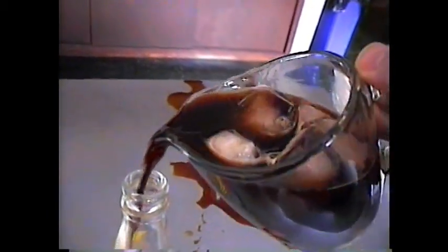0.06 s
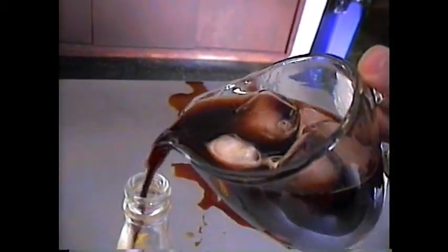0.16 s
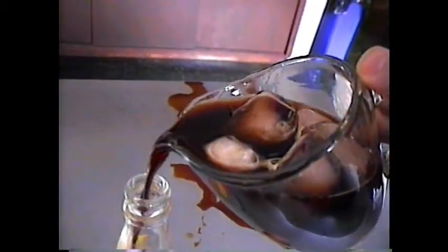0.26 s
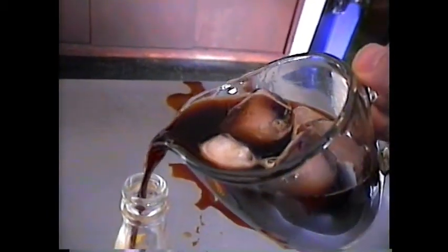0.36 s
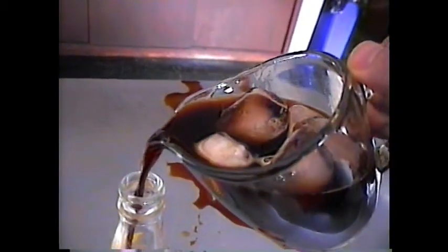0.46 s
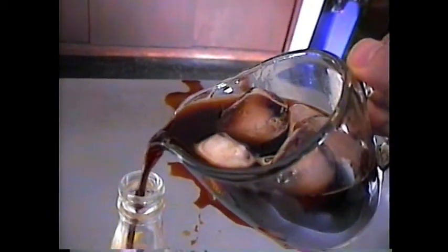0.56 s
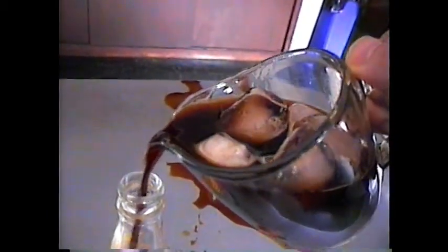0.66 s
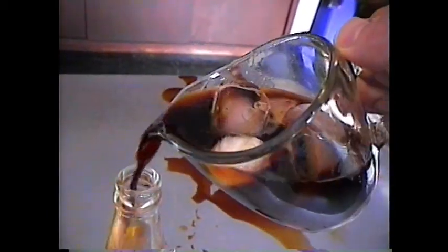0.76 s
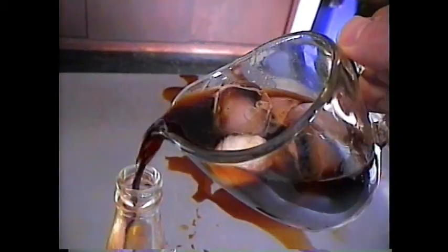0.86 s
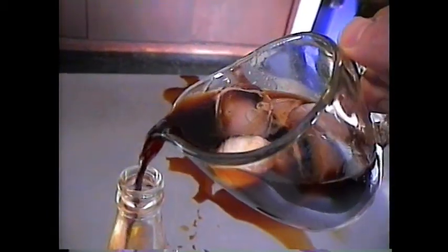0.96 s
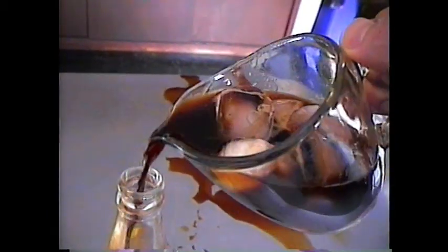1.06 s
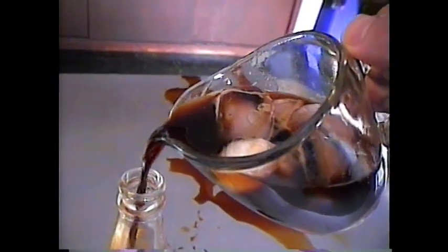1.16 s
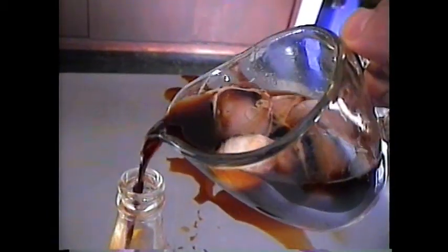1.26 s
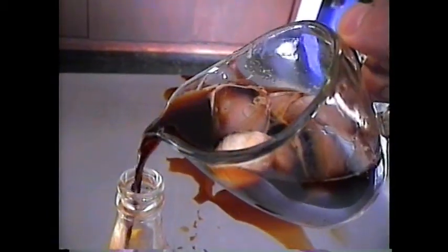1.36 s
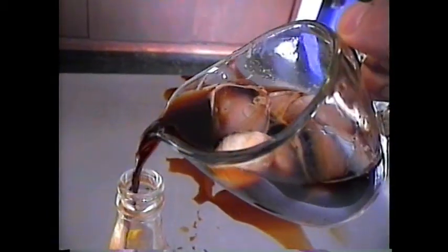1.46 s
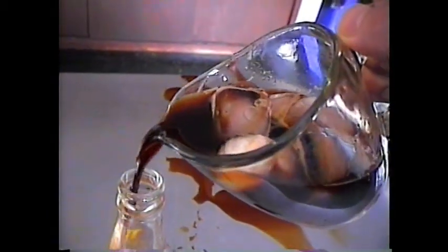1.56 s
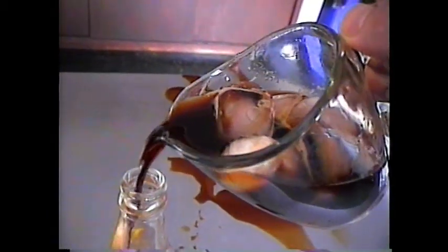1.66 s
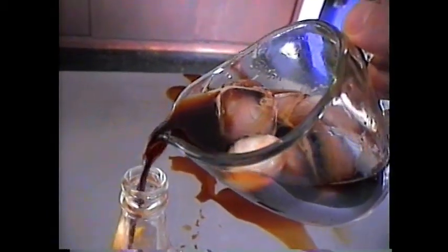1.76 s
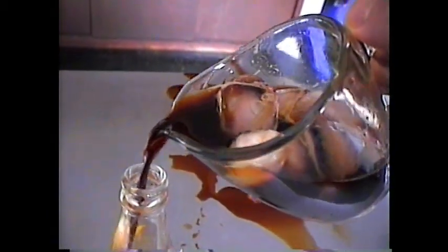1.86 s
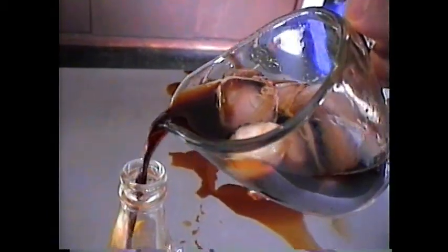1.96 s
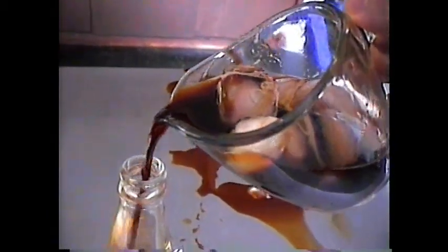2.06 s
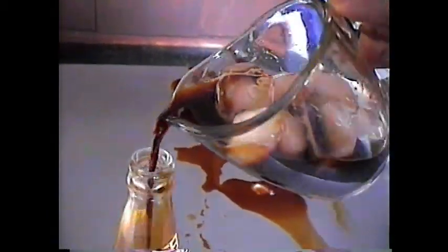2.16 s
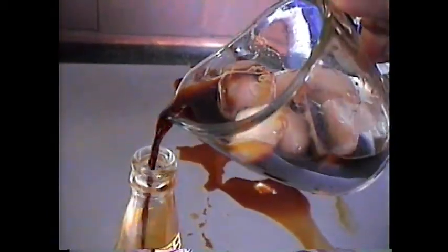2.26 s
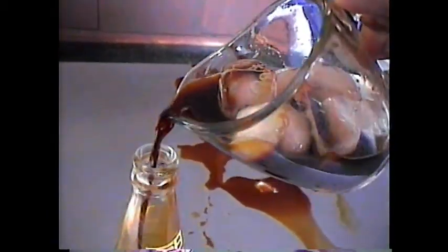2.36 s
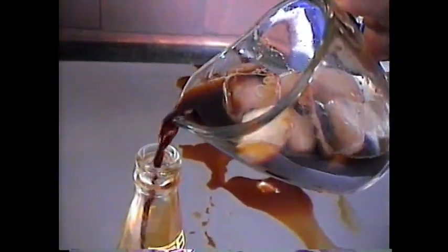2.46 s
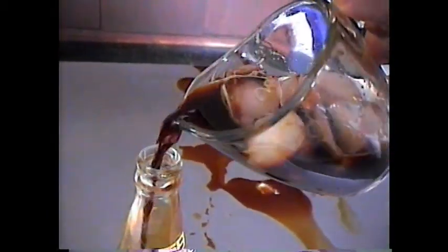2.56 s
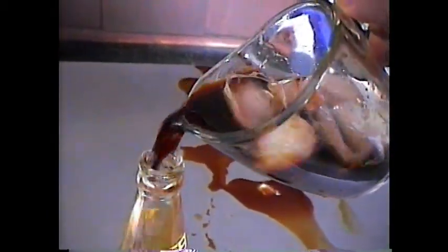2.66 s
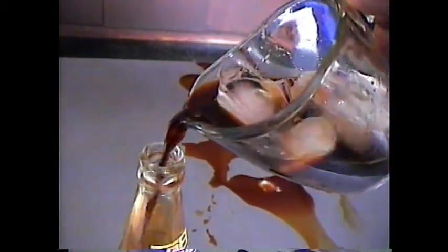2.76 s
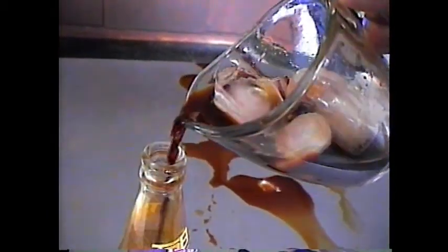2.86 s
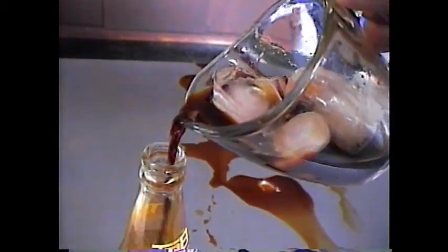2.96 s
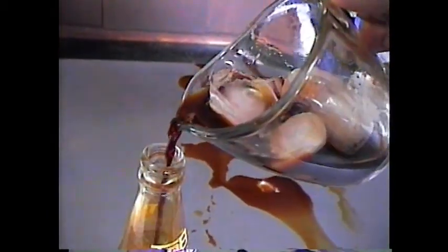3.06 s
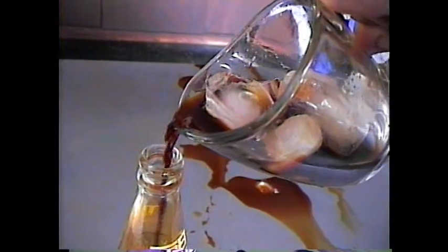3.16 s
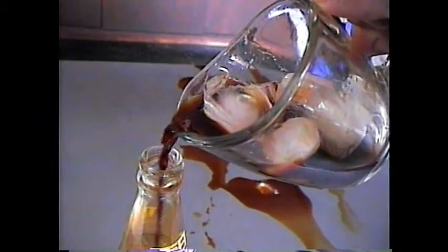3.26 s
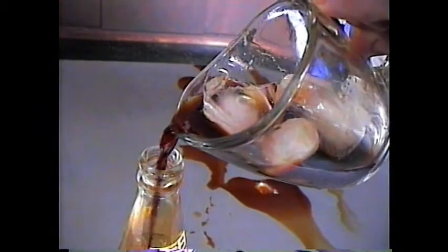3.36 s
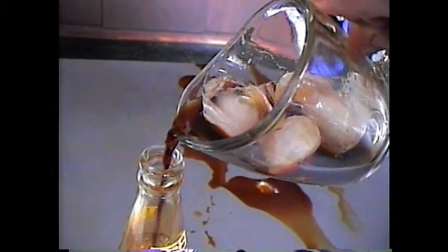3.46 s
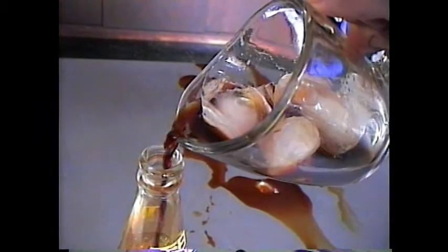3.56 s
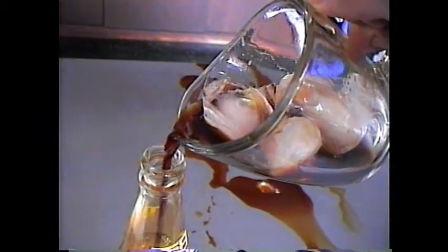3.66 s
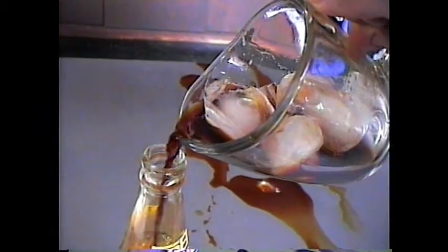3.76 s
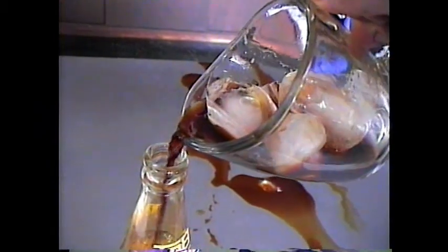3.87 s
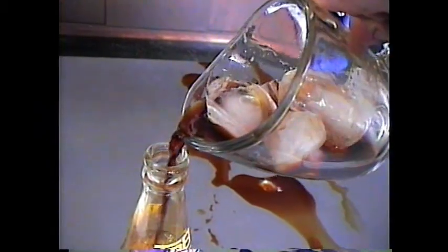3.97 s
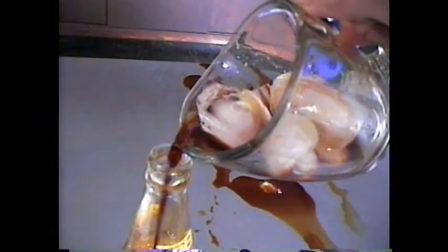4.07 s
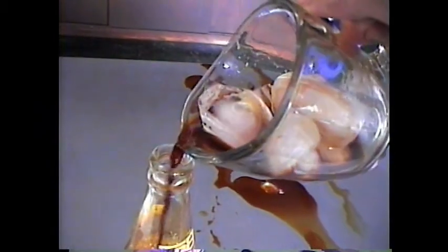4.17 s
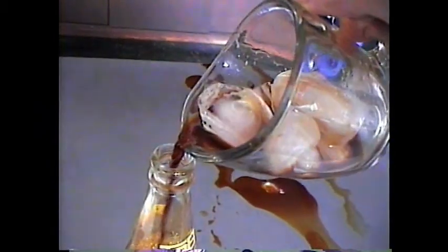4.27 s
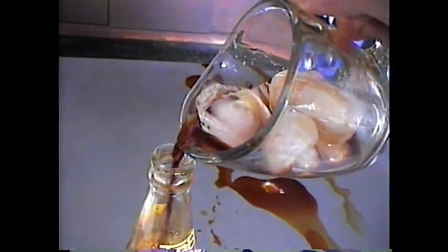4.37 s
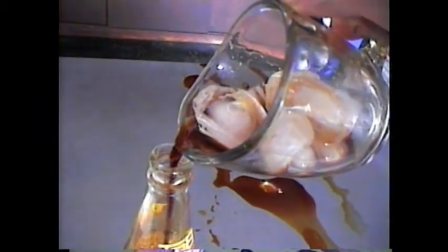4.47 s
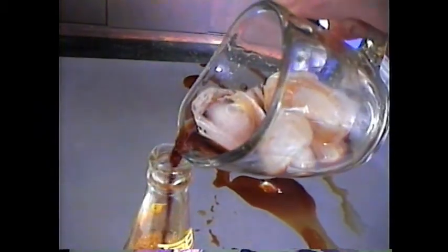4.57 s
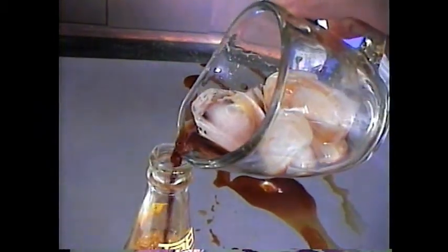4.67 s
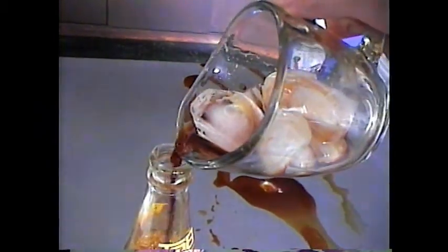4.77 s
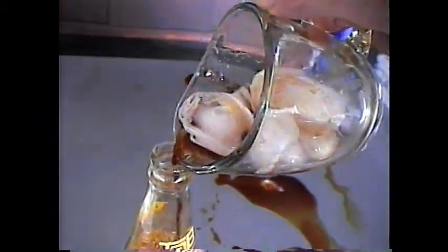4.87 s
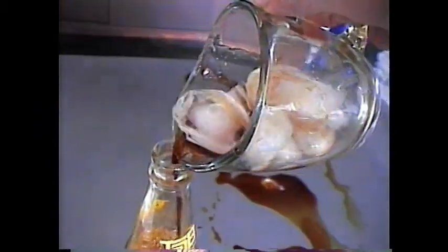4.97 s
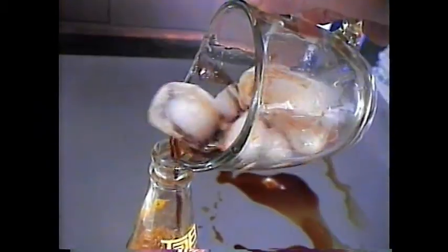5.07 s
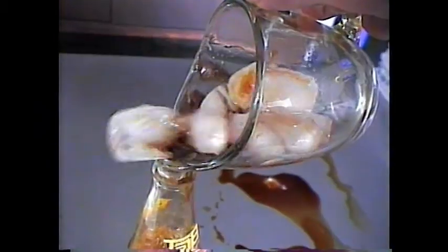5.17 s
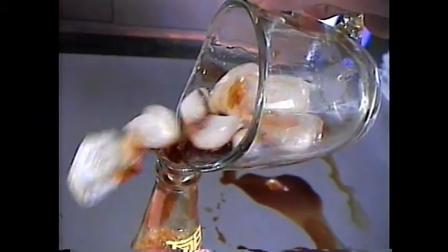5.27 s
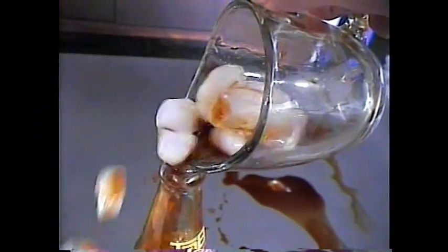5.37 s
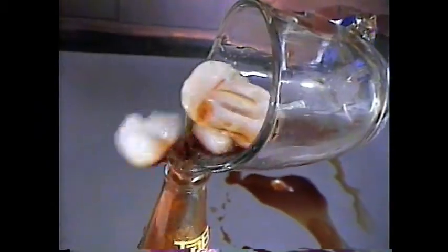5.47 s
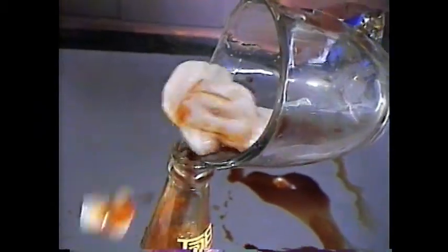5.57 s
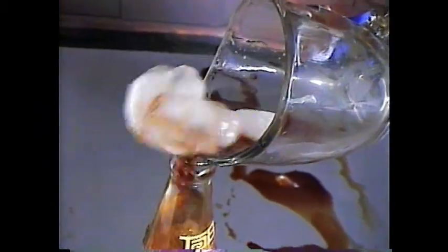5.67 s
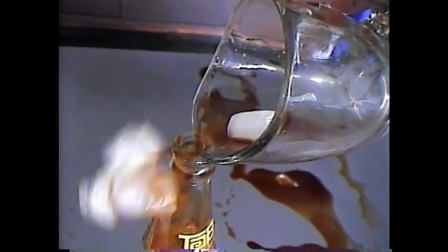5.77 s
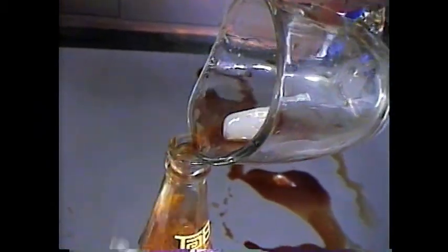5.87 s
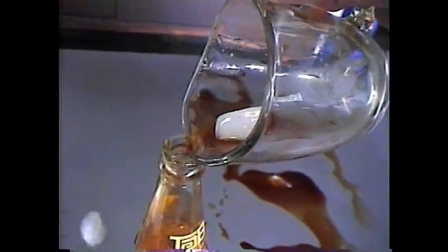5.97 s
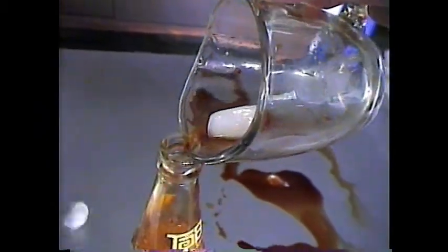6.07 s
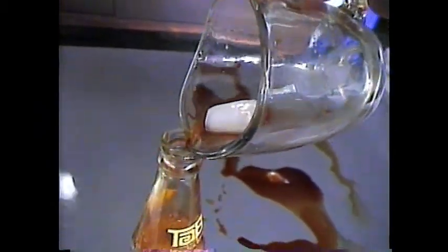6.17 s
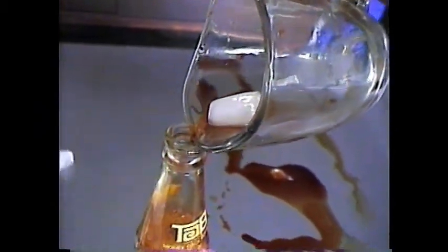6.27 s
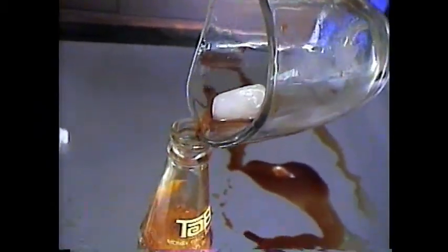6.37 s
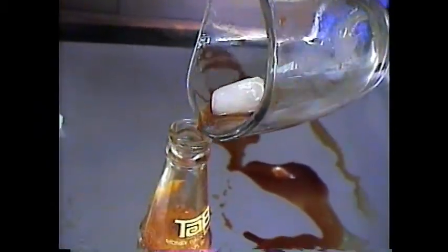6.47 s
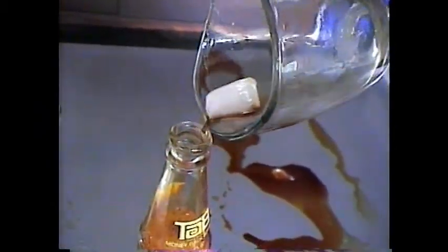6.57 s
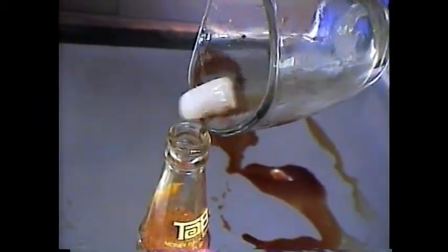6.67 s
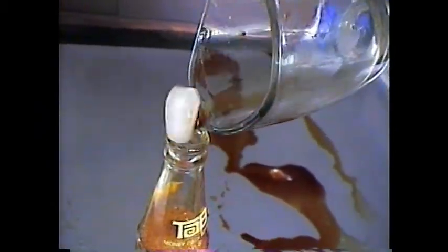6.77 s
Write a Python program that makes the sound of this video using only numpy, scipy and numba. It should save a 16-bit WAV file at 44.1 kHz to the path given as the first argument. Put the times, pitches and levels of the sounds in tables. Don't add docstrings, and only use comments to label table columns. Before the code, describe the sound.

Close in a small kitchen, cold liquid slaps and plinks into a narrow bottle, hollow notes slowly climbing. The stream thins, ice clicks wetly and sparse drips follow. Then cubes rattle against the glass pitcher, spill out and crash on a hard counter, a last one landing farther off. A lo-fi camera microphone on the left only adds hum, hiss and ticking.

```python
import sys
import numpy as np
from scipy import signal
from scipy.fft import rfft, irfft, next_fast_len
from scipy.io import wavfile
from scipy.ndimage import map_coordinates
from numba import njit

SR = 44100
rng = np.random.default_rng(int(sys.argv[2]) if len(sys.argv) > 2 else 0)


def inscribe(sig):
    pcm = np.round(np.clip(np.atleast_2d(sig).T, -1, 1) * 32767)
    wavfile.write(sys.argv[1], SR, pcm.astype(np.int16))


def ratio_of_db(decibels):
    return 10 ** (np.asarray(decibels, float) / 20)


N = 300762


def unit(x):
    return x / np.sqrt(np.mean(x ** 2) + 1e-20)


def seconds(length):
    return np.arange(length) / SR


def along(points, hz):
    f, v = np.transpose(points)
    return np.interp(np.log(hz + 1), np.log(f + 1), v)


def curves(rows):
    s, *columns = np.transpose(rows)
    return [np.interp(seconds(N), s, column) for column in columns]


def filtered(x, response):
    m = next_fast_len(len(x) + 8192)
    return irfft(rfft(x, m) * response(np.fft.rfftfreq(m, 1 / SR)), m)[:len(x)]


def peak(f, hz, width):
    return 1j * f * width / (hz * hz - f * f + 1j * f * width + 1e-9)


def add(track, s, sound):
    part = track[round(s * SR):][:len(sound)]
    part += sound[:len(part)]


def wander(points):
    return map_coordinates(rng.standard_normal(points), [np.linspace(0, points - 1, N)])


@njit
def resonate(x, turn, keep):
    y, z = np.zeros(len(x)), 0j
    for i in range(len(x)):
        z = z * keep * np.exp(1j * turn[i]) + x[i]
        y[i] = z.imag
    return y


def air(x, hz, width_hz):
    return resonate(x, 2 * np.pi * hz / SR, np.exp(-np.pi * width_hz / SR))


def snap(hz, t60, spread, body_db):
    t = seconds(900)
    front = 1 - np.exp(-t / 0.00026)
    burst = rng.standard_normal(len(t)) * ratio_of_db(-60 * t / t60) * front
    burst = filtered(burst, lambda f: 1 / (1 + 1j * f / 7000) ** 2 + ratio_of_db(body_db) * peak(f, hz, spread * hz) ** 2)
    return burst / np.abs(burst).max()


def snap_each(table, t60, spread, body_db):
    out = np.zeros(N)
    for s, db, hz in table:
        add(out, s, ratio_of_db(db - 2.5) * snap(hz, t60, spread, body_db))
    return out


def ping(table, rise, attack):
    out, t = np.zeros(N), seconds(SR // 8)
    for s, db, hz, t60 in table:
        swell = 1 - np.exp(-t / attack)
        add(out, s, ratio_of_db(db - 60 * t / t60) * swell * np.sin(2 * np.pi * hz * t * (1 + rise * t / t60)))
    return out


def droplets(count, centre_hz, cycles, scatter_db):
    draw, step = rng.random((count, 2)), np.arange(160)
    hz = np.clip(centre_hz * np.exp(0.464 * rng.standard_normal(count)), 300, 12000)[:, None]
    size = ratio_of_db(scatter_db * np.minimum(-np.log(draw[:, 1:]), 3))
    grains = size * np.exp(-step * hz / SR / cycles) * np.sin(2 * np.pi * hz * step / SR)
    at = (draw[:, :1] * N).astype(int) + step
    return unit(np.bincount(at.ravel(), grains.ravel(), minlength=N)[:N])


# (time [s], cavity note [Hz], first pipe note [Hz], second pipe note [Hz])
BOTTLE_AIR = [
    (0, 241, 1436, 2180),
    (.3, 244, 1480, 2280),
    (.75, 250, 1530, 2340),
    (1.2, 255, 1660, 2650),
    (2.2, 271, 1720, 2930),
    (3, 304, 1820, 3600),
    (5.1, 347, 2150, 3400),
]
# (time [s], fine spatter level [dB], cavity drone level [dB])
STREAM = [(0.0, -39.5, -42), (0.1, -45.5, -36), (0.5, -46, -44.5), (0.745, -46, -39.5), (0.762, -64, -82),
          (.9, -55.5, -57), (1.05, -45.5, -37), (1.4, -49.5, -48.5), (1.74, -47, -41.5), (1.77, -59, -59),
          (1.82, -51, -47.5), (2.2, -48.5, -46.5), (2.25, -56, -65), (2.6, -54.5, -48), (3, -59, -46.5),
          (4.0, -56, -53), (4.52, -60.5, -52), (5.1, -59.5, -54)]
# (time [s], slap level [dB], cavity note level [dB], pipe note level [dB])
FULL_DROPS = [(0.03, -30.5, -60, -46), (0.058, -44, -63, -53), (0.0713, -39, -68, -36),
              (0.0951, -35.5, -36, -100), (0.1355, -45, -35, -56), (0.1543, -37, -39, -37),
              (0.198, -38, -39, -60), (0.216, -34, -41, -34.5), (0.237, -45, -65, -46),
              (0.27, -39, -62, -47), (0.293, -42, -46, -35), (0.3036, -34, -31, -31.5),
              (0.3293, -37.5, -36.5, -33.5), (0.3647, -35, -40, -37), (0.3732, -39, -38.5, -43),
              (0.395, -47, -45, -39), (0.4137, -32.5, -65, -60), (0.4377, -39, -39, -32.5),
              (0.4516, -38.5, -54, -71), (0.4626, -38, -31, -60), (0.48, -36, -64, -40),
              (0.519, -32.5, -39.5, -33), (0.5667, -39.5, -36, -32), (0.5888, -46, -34, -49),
              (0.601, -42, -48, -33), (0.622, -39, -38.5, -38), (0.65, -38.5, -54, -36),
              (0.668, -37.5, -58, -41), (0.7137, -42, -73, -35), (0.736, -49, -47, -37)]
# (time [s], slap level [dB], cavity note level [dB], pipe note level [dB])
THIN_DROPS = [(0.863, -49, -69, -68), (0.927, -43.5, -72, -54), (0.95, -50, -67, -63),
              (0.9623, -36.5, -57, -50), (0.9836, -32, -45, -64), (1.026, -43.5, -61, -43),
              (1.0516, -42, -44, -44), (1.1161, -41, -39, -42), (1.1538, -41, -48, -43),
              (1.1756, -37.5, -47, -43), (1.2057, -44, -50, -39), (1.267, -43, -60, -63),
              (1.31, -46, -45, -50), (1.4217, -42.5, -60, -68), (1.4479, -47, -54, -52),
              (1.506, -48.5, -50, -40), (1.5381, -56, -40.5, -37), (1.576, -52, -53, -49),
              (1.6256, -45, -61, -72), (1.648, -41.5, -42, -64), (1.6673, -52, -37.5, -43),
              (1.83, -41.5, -68, -43), (1.846, -42, -46, -60), (1.939, -53, -43, -57),
              (2.0047, -47, -43, -40), (2.053, -44, -43.5, -40), (2.1438, -47, -57, -52),
              (2.1801, -49, -47, -63)]


def pour():
    cavity_hz, first_hz, second_hz = curves(BOTTLE_AIR)
    waver = 1 + 0.021 * wander(200)
    first_hz, second_hz = first_hz * waver, second_hz * waver
    spatter_db, drone_db = curves(STREAM + [(5.2, -48, -69)])
    cavity_width, first_width, second_width = 17, 80, 140
    snaps, kicks, taps = np.zeros((3, N))
    for s, slap_db, push_db, tap_db in FULL_DROPS + THIN_DROPS:
        slap_hz = 5000 * ratio_of_db(0.3 * (slap_db + 39)) * np.exp(0.13 * rng.standard_normal())
        add(snaps, s, ratio_of_db(slap_db + 0.5) * snap(slap_hz, t60=0.022, spread=0.96, body_db=11))
        add(kicks, s, ratio_of_db(push_db - 2.5) * np.ones(1))
        add(taps, s, ratio_of_db(tap_db - 6.0) * np.ones(1))

    spatter = ratio_of_db(spatter_db - 13.0) * droplets(count=11000, centre_hz=5450, cycles=2.9, scatter_db=7.0)
    spatter = filtered(spatter, lambda f: 0.61 + ratio_of_db(-7.0) * peak(f, 5100, 360))
    hollow = ratio_of_db(np.interp(seconds(N), [0, .8, 2.2, 3], [-11.5, -10.5, -16.5, -19]))
    churn = ratio_of_db(spatter_db) * droplets(count=3000, centre_hz=1900, cycles=0.11, scatter_db=4.5)
    first = air(taps + ratio_of_db(-27.0) * hollow * churn, first_hz, first_width)
    fading = hollow ** 2 * ratio_of_db(-140 * np.clip(first_hz / 1530 - 1, 0, .1))
    second = air(fading * (ratio_of_db(-18.0) * taps + ratio_of_db(-13.5) * churn), second_hz, second_width)
    cavity = air(kicks, cavity_hz, cavity_width)
    drone = air(droplets(count=1500, centre_hz=587, cycles=1.0, scatter_db=3.5), cavity_hz, cavity_width)
    return snaps + spatter + first + second + cavity + ratio_of_db(drone_db - 12.5) * unit(drone)


# (time [s], level [dB], note [Hz], t60 [s])
FULL_PLINKS = [(0.008, -41.5, 2260, 0.033), (0.024, -45, 2250, 0.012), (0.028, -47, 3050, 0.033),
               (0.072, -43, 2370, 0.036), (0.073, -47, 2050, 0.05), (0.094, -41, 2260, 0.029),
               (0.152, -41.5, 2350, 0.035), (0.211, -39, 2360, 0.03), (0.271, -47, 2300, 0.028),
               (0.301, -37, 2340, 0.034), (0.371, -43, 2820, 0.025), (0.394, -40, 2260, 0.026),
               (0.435, -46, 2320, 0.027), (0.478, -35, 2400, 0.023), (0.517, -38, 2400, 0.025),
               (0.587, -38, 2360, 0.029), (0.632, -38.5, 2450, 0.03), (0.734, -36, 3000, 0.02)]
# (time [s], level [dB], note [Hz], t60 [s])
THIN_PLINKS = [(1.027, -50, 3800, 0.025), (1.05, -51, 2840, 0.025), (1.05, -41, 2150, 0.027),
               (1.05, -42, 2410, 0.025), (1.265, -47, 5300, 0.025), (1.417, -45, 3840, 0.028),
               (1.419, -47, 2460, 0.025), (1.42, -46, 2970, 0.028), (1.418, -43, 4750, 0.025),
               (1.537, -46, 2910, 0.027), (1.558, -48, 5100, 0.027), (1.573, -47, 2760, 0.039),
               (1.665, -52, 3020, 0.025), (1.805, -48, 3940, 0.027), (1.844, -46, 2500, 0.025),
               (1.845, -46, 2750, 0.025), (1.908, -45, 5460, 0.028), ]


def plinks():
    return ratio_of_db(1) * ping(FULL_PLINKS + THIN_PLINKS, rise=0.012, attack=.002)


# (time [s], level [dB], note [Hz], t60 [s])
GLUGS = [
    (0.106, -30, 229, 0.11),
    (1.503, -40, 1200, 0.04),
    (1.513, -44, 1340, 0.04),
    (1.525, -42, 1190, 0.04),
    (1.55, -44, 1280, 0.053),
    (1.57, -50, 1350, 0.04),
    (2.785, -31.5, 290, 0.064),
    (2.81, -31.5, 314, 0.049),
    (2.847, -30, 517, 0.013),
    (3.82, -40.5, 597, 0.033),
]


def gurgle():
    stream = ratio_of_db(curves(STREAM + [(5.2, -52, -80)])[0] - 17)
    settling = ratio_of_db(np.interp(seconds(N), [2.5, 2.56, 2.72, 2.9], [-105, -68, -70, -85]))
    flutter = ratio_of_db(3.6 * wander(1400))
    burble = droplets(count=5000, centre_hz=2806, cycles=4, scatter_db=5.5)
    fizz = droplets(count=1800, centre_hz=7460, cycles=6.2, scatter_db=5.5)
    return (stream + settling) * (burble + fizz) + flutter * ping(GLUGS, rise=0.13, attack=0.0062)


# (frequency [Hz], t60 [s])
KITCHEN = [(200, 0.43), (1400, 0.31), (3700, 0.56), (10000, 0.42)]


def tail():
    length = SR * 3 // 4
    hz, t, z = signal.stft(rng.standard_normal(length), SR, nperseg=256)
    decay = ratio_of_db(-60 * t / along(KITCHEN, hz)[:, None])
    return unit(signal.istft(z * decay, SR, nperseg=256)[1]) / np.sqrt(length)


# (frequency [Hz], level [dB per Hz])
HUM = [(20, -16.5), (65, -16), (90, -20), (115, -15), (236, -6.5), (346, -12.5), (582, -16), (900, -21.5),
       (2300, -30.5), (2700, -45), (3650, -36), (8790, -38.5), (12200, -44), (13500, -47)]
# (frequency [Hz], width [Hz], level over the hum [dB])
HUM_NOTES = [(118, 23, 7), (250, 44, 6.5), (348.4, 19.7, 14.5), (524.6, 34, 10.5), (1606, 94, 9.5),
             (1800, 60, 8.5), (2150, 170, 7.5), (8530, 170, 8)]


def hum():
    lift = lambda f: sum(db * np.abs(peak(f, hz, width)) ** 2 for hz, width, db in HUM_NOTES)
    noise = filtered(rng.standard_normal(N), lambda f: ratio_of_db(along(HUM, f) + lift(f)))
    return ratio_of_db(-57 - 2.0) * unit(noise)


# (time [s], level [dB])
GEAR = [
    (0, -56),
    (4, -61),
    (4.5, -52),
    (5.1, -50),
]


def gear():
    beat = np.arange(-135, 20)
    s = 4.511 + beat / 29.97
    db = np.interp(s, *np.transpose(GEAR)) - 5 * (beat % 2) + 1.7 * rng.standard_normal(len(s))
    return ping([(t, level, 3250, .018) for t, level in zip(s, db)], rise=.001, attack=0.0035)


# (frequency [Hz], level [dB])
IDLE = [(59.94, -88), (179.8, -99), (8570, -83)]


def idle():
    return sum(ratio_of_db(db) * np.sin(2 * np.pi * hz * seconds(N)) for hz, db in IDLE)


# (time [s], peak level [dB], colour [Hz])
SHIFTS = [(2.432, -46.5, 1800), (2.449, -49, 3500), (2.4907, -59, 4670), (2.494, -54, 4660),
          (2.5012, -43, 4600), (2.512, -52, 4370), (2.552, -38.5, 1310), (2.555, -45, 2980),
          (2.563, -42, 1420), (2.5718, -39, 2830), (2.582, -43, 2980), (2.592, -35.5, 1230),
          (2.629, -32, 3500), (2.647, -40.5, 1320), (2.65, -38, 1500), (2.6786, -48, 1830),
          (2.6988, -51, 2400), (2.711, -53, 3040), (2.7194, -47, 1760), (2.741, -47, 1520),
          (2.749, -41, 5470), (2.768, -39, 7160), (2.785, -34.5, 2920), (2.792, -43, 3100),
          (2.824, -36, 8700), (2.8624, -45.5, 3340)]


def settling_ice():
    return snap_each(SHIFTS, t60=0.011, spread=0.64, body_db=10.0)


# (time [s], peak level [dB], colour [Hz])
LATE_DRIPS = [(3.04, -47, 4800), (3.122, -44, 7000), (3.3146, -45, 2760), (3.334, -47, 3670),
              (3.359, -46.5, 3740), (3.513, -41, 3500), (3.549, -40.5, 5030), (3.756, -49, 4720),
              (3.778, -44, 3780), (3.945, -39, 4660), (3.96, -40, 3350), (4.004, -54, 3800),
              (4.035, -45, 4550), (4.2488, -41, 4300), (4.6168, -45.5, 4180)]


def late_drips():
    return snap_each(LATE_DRIPS, t60=0.014, spread=0.37, body_db=2.5)


# (time [s], peak level [dB], colour [Hz], low wall ring level [dB], high wall ring level [dB])
RATTLE = [(5.036, -40, 4570, -8, -19), (5.052, -34.5, 1300, -5, -35), (5.0628, -21.5, 4500, -20, -22.5),
          (5.092, -41, 2200, -9, -19), (5.104, -39, 4300, -10, -14), (5.1186, -23, 1850, -3.5, -17),
          (5.1404, -25, 2090, -20, -18), (5.1589, -31.5, 2340, -4.5, -5.5), (5.1819, -13, 3800, -27, -25),
          (5.227, -29, 2440, -7, -11), (5.238, -13.5, 2580, -18, -7.5), (5.2501, -28, 2500, -3, -13),
          (5.256, -16, 1900, -11.5, -19), (5.2706, -31, 1840, -7, -13), (5.292, -26, 2600, -17, -37),
          (5.3317, -25, 2280, -17, -14), (5.3454, -15.5, 2570, -15, -35), (5.3587, -27, 4550, -15, -10),
          (5.37, -33, 2940, -27, -9.5), (5.3806, -13.5, 3420, -34, -23), (5.4016, -31, 2470, -31, -5),
          (5.4105, -13, 2900, -21, -17), (5.4185, -16.5, 6050, -31, -14), (5.4278, -14.5, 3120, -34, -10),
          (5.444, -14.5, 2200, -8, -18), (5.481, -24, 2460, -31, -23)]
# (note [Hz], t60 [s])
WALL = [(990, 0.038), (2440, 0.046)]
# (low [1/s], high [1/s])
WALL_SAG = [0.27, 0.005]
# (note [Hz], level [dB], t60 [s])
WEAK_NOTES = [(3800, -19.5, 0.0063), (4500, -21, 0.0062), (5860, -17.5, 0.0055)]


def rattle():
    out, t = np.zeros(N), seconds(SR // 8)
    for s, db, hz, *ring_db in RATTLE:
        add(out, s, ratio_of_db(db - 6.0) * snap(hz, t60=0.0093, spread=0.87, body_db=13.5))
        since = s - RATTLE[0][0]
        notes = [(f * (1 - sag * since), level - 6.5, t60)
                 for (f, t60), sag, level in zip(WALL, WALL_SAG, ring_db)]
        notes += [(f * rng.normal(1, 0.058), level + rng.normal(0, 6.7), t60) for f, level, t60 in WEAK_NOTES]
        ring = np.zeros(len(t))
        for f, level, t60 in notes:
            ring += ratio_of_db(level - 60 * t / t60) * np.sin(2 * np.pi * f * rng.normal(1, .018) * t)
        uneven_db = 4.7 * np.interp(t, np.arange(40) / 300, rng.standard_normal(40))
        add(out, s, ratio_of_db(db + uneven_db) * ring)
    return out


def slide():
    level = ratio_of_db(np.interp(seconds(N), [5.08, 5.14, 5.5, 5.52], [-94, -59.5, -63.0, -68.5]))
    return level * droplets(count=2500, centre_hz=1740, cycles=3.3, scatter_db=8.5)


# (time [s], level [dB], note [Hz], t60 [s])
CLINKS = [
    (5.349, -20.5, 3300, 0.013),
    (5.381, -16, 3620, 0.012),
    (5.412, -34, 3860, 0.033),
    (5.419, -31, 1500, 0.0099),
    (5.421, -30.5, 905, 0.026),
    (5.447, -37, 4200, 0.024),
    (5.484, -38, 3780, 0.018),
]


def clinks():
    return ping(CLINKS, rise=.001, attack=0.00088)


# (time [s], force [dB], hardness [Hz], counter knock level [dB], close crack level [dB])
FALLS = [(5.522, -17, 8600, 17, 9), (5.543, -23.5, 3020, -2, -1.5), (5.574, -22, 4500, -9, 20.5),
         (5.598, -21.5, 4500, 5, 2), (5.641, -28.5, 3650, 14, -2), (5.675, -35, 4000, 1, 17),
         (5.730, -16.5, 1500, 12, 20.5), (5.759, -25, 1120, 8, 28), (5.788, -30.5, 2000, -5, 28.5),
         (5.797, -28, 10200, -18, 21), (5.9876, -23.5, 5000, 4, 25.5), (6.007, -18, 1900, 4, 21),
         (6.016, -33, 2500, 3, 18), (6.044, -31, 4060, 1, 27), (6.070, -21.5, 9100, 22, 20),
         (6.107, -36, 6030, 16, 28), (6.174, -20.5, 11900, 16.5, 8.5), (6.195, -28, 4000, -2, 10),
         (6.217, -31.5, 4940, -11, 7), (6.265, -23.5, 9450, 2, 16), (6.275, -28.5, 5000, 5, 28.5),
         (6.334, -35, 3100, 8, 21.5), (6.6567, -25.5, 5100, -13, -3), (6.6692, -42, 14000, 2, 11),
         (6.727, -37.5, 5030, -4, -2), (6.795, -40.5, 5900, 0, 7), (6.802, -38.5, 2500, -2, -22),
         (6.816, -35.5, 4300, -11, 6)]
# (frequency [Hz], width [Hz], level [dB])
COUNTER = [(255, 167, -2.5), (347, 10.8, 13), (460, 210, -4), (1024, 167, 2), (1500, 355, 2),
           (2500, 410, 2.5), (3500, 2340, -4.5)]
# (frequency [Hz], level [dB per Hz])
CLOSE_ICE = [(47, -45), (80, -42), (261, 2), (304, -12), (355, -13), (482, -0.5), (537, -4), (5240, 1),
             (10100, 2.5), (13700, -31), (15000, -74)]
# (frequency [Hz], level [dB per Hz])
FAR_ICE = [(80, -29), (180, -29), (291, 0), (537, 2.5), (1100, 8.5), (2500, 4), (4600, -4.5), (6000, -19),
           (8000, -12), (12600, -55), (15000, -77)]


def crash():
    out, t = np.zeros(N), seconds(SR // 2)
    slab = lambda f: np.abs(sum((-1) ** k * ratio_of_db(level) * peak(f, c, width)
                                for k, (c, width, level) in enumerate(COUNTER)))
    for s, db, hz, knock_db, crack_db in FALLS:
        far = s > 6.5
        colour = FAR_ICE if far else CLOSE_ICE
        bounce = np.interp(t, np.arange(200) / 130, rng.standard_normal(200))
        skitter = ratio_of_db(3.25 * np.exp(-t / 0.056) * bounce)
        if far:
            skitter = skitter ** 0.99 * ratio_of_db(2.5 * np.exp(-(t / 0.01) ** 2))
        echo = unit(tail()[:len(t)]) * skitter * (1 - np.exp(-t / 0.00013))
        if not far:
            echo *= 1 - 0.11 * np.exp(-t / 0.0055)
        soft = lambda f: 1 / np.sqrt(1 + (f / hz) ** 6)
        echo = filtered(echo, lambda f: ratio_of_db(along(colour, f)) * soft(f) + ratio_of_db(knock_db - 6) * slab(f))
        add(out, s, ratio_of_db(db) * echo / np.sqrt(np.mean(echo[:1300] ** 2)))
        add(out, s, ratio_of_db(db + crack_db - 4.5) * snap(hz / 2, t60=0.0078, spread=2.5, body_db=17))
        jolt = (1 - t / 0.0053) * np.exp(-t / 0.0083) * (1 - np.exp(-t / 0.003))
        add(out, s, ratio_of_db(db - 7.5) * jolt)
    return out


def shards():
    busy, t = np.zeros(N), seconds(SR // 4)
    for s, db, *_ in FALLS:
        add(busy, s, ratio_of_db(db - 60 * t / 0.28) * (1 - np.exp(-t / 0.012)))
    return ratio_of_db(-8.5) * busy * droplets(count=2200, centre_hz=2400, cycles=2.1, scatter_db=7.5)


# (time [s], level [dB], note [Hz], t60 [s])
CHIMES = [(5.532, -29, 1570, 0.027), (5.537, -15.5, 435, 0.037), (5.538, -18, 2550, 0.037),
          (5.551, -20, 1513, 0.09), (5.585, -16, 1490, 0.032), (5.596, -29, 3900, 0.033),
          (5.605, -15, 2500, 0.042), (5.612, -18, 1650, 0.044), (5.617, -30, 3630, 0.027),
          (5.634, -17.5, 1247, 0.039), (5.654, -18, 2660, 0.035), (5.722, -13, 2500, 0.027),
          (5.727, -24, 1610, 0.026), (5.727, -24, 1204, 0.03), (5.727, -18, 460, 0.026),
          (5.743, -31, 2500, 0.03), (5.762, -9, 368, 0.043), (5.779, -14.5, 393, 0.029),
          (5.781, -33, 1660, 0.027), (5.846, -35, 387, 0.018), (5.855, -28, 1500, 0.03),
          (6.006, -13.5, 517, 0.039), (6.01, -19, 1380, 0.041), (6.021, -18.5, 351, 0.07),
          (6.042, -28, 1680, 0.023), (6.055, -23, 2740, 0.035), (6.056, -22, 4420, 0.03),
          (6.058, -19, 344, 0.061), (6.064, -15.5, 1780, 0.041), (6.084, -20, 353, 0.041),
          (6.084, -18, 2500, 0.033), (6.1, -26, 2740, 0.033), (6.188, -15, 2510, 0.03),
          (6.199, -23, 1580, 0.043), (6.217, -20.5, 351, 0.036), (6.354, -28, 3360, 0.049)]
# (time [s], level [dB], note [Hz], t60 [s])
LAST_CHIMES = [
    (6.656, -23, 3080, 0.025),
    (6.657, -20.5, 3670, 0.027),
    (6.658, -40, 1460, 0.022),
    (6.658, -28, 1960, 0.03),
    (6.66, -22, 1236, 0.052),
    (6.66, -27, 2400, 0.028),
    (6.718, -27, 1580, 0.033),
    (6.8, -33, 1010, 0.039),
    (6.805, -32, 5950, 0.024),
    (6.809, -32, 2430, 0.03),
]


def chimes():
    return ratio_of_db(7.5) * ping(CHIMES + LAST_CHIMES, rise=0.0012, attack=0.0048)


# (time [s], peak level [dB])
THUDS = [
    (5.733, -10),
    (5.786, -20.5),
    (5.991, -12),
    (6.174, -19.5),
    (6.265, -27),
    (6.334, -22),
]


def thuds():
    out, t = np.zeros(N), seconds(SR // 2)
    for s, db in THUDS:
        add(out, s, ratio_of_db(db - 4.5) * np.sin(2 * np.pi * 150 * t) * np.exp(-t / 0.002))
    return out


def microphone(f):
    return 1 / (1 + 1j * f / 11000) ** 4 * (1j * f / (130 + 1j * f)) ** 3


def scene():
    liquid = pour() + plinks() + settling_ice() + late_drips()
    ice = rattle() + slide() + clinks() + chimes()
    near = filtered(liquid + ice, microphone)
    room = signal.fftconvolve(near, tail())[:N]
    room = filtered(room, lambda f: 1 / (1 + 1j * f / 4500))
    left = near + ratio_of_db(-14.5) * room + filtered(gurgle(), microphone)
    left = left + hum() + gear() + crash() + shards() + thuds()
    return np.array([2 * left, idle()])


@njit
def follow(level, rise, fall):
    out, held = np.zeros(len(level)), 0.0
    for i in range(len(level)):
        held += (rise if level[i] > held else fall) * (level[i] - held)
        out[i] = held
    return out


def band_limit(x):
    return signal.sosfilt(signal.butter(12, 15130, fs=SR, output="sos"), x)


def record(dry):
    heard = np.abs(filtered(dry[0], lambda f: np.abs(1 + 1j * f / 3500)))
    held = follow(heard, 1.0, 1 / (0.03 * SR))
    gain = (1 + (held / ratio_of_db(-6.0)) ** 3) ** (-.31)
    thump = filtered(np.log(gain), lambda f: 1j * f / 25 / (1 + 1j * f / 25) / (1 + 1j * f / 90) ** 2)
    limited = dry[0] * gain
    rounded = limited / (1 + (limited / .4) ** 4) ** .25
    left = rounded + ratio_of_db(-35.0) * thump
    left = filtered(left, lambda f: 1 / np.sqrt(1 + (f / 13200) ** 14))
    return band_limit(np.array([left, dry[1]]))


dry = scene()
out = record(dry)
inscribe(out)
```